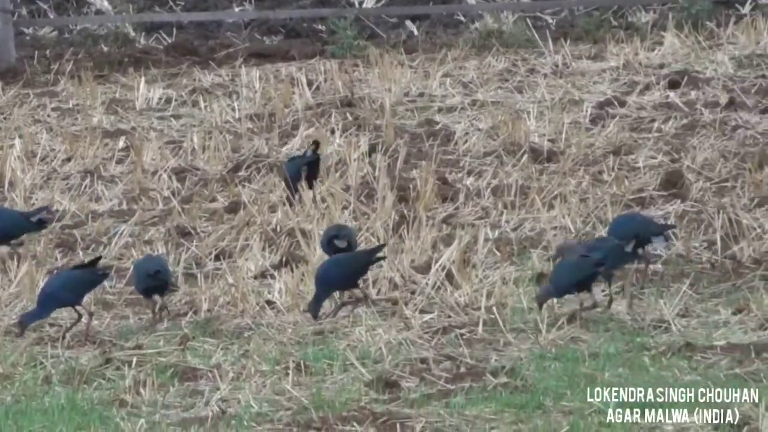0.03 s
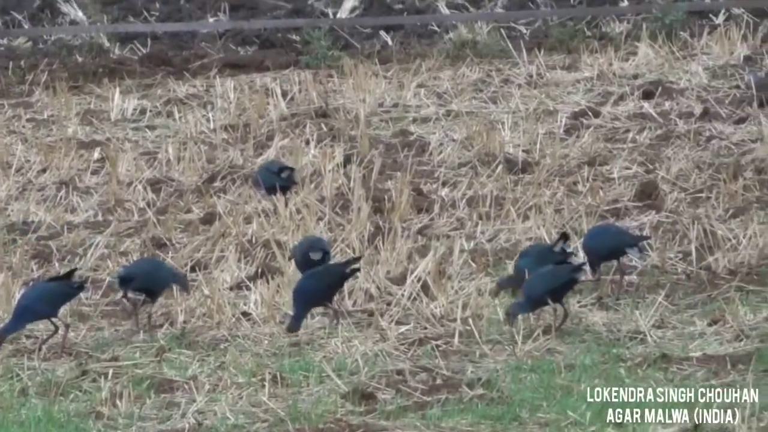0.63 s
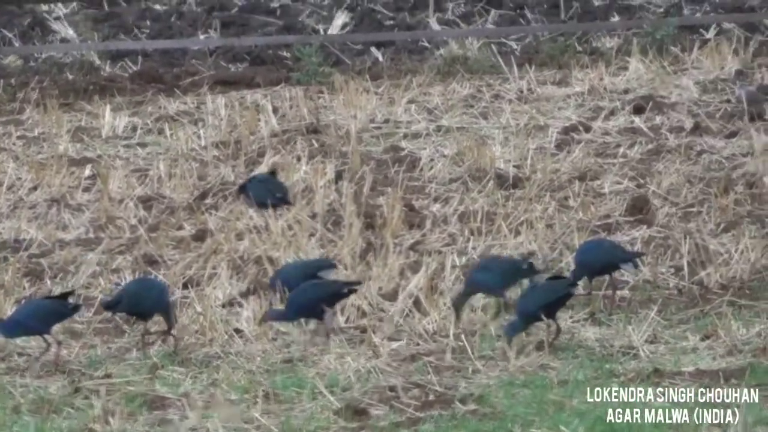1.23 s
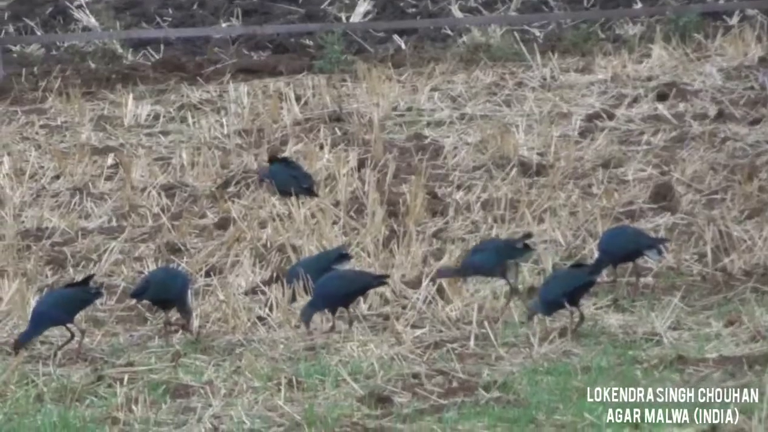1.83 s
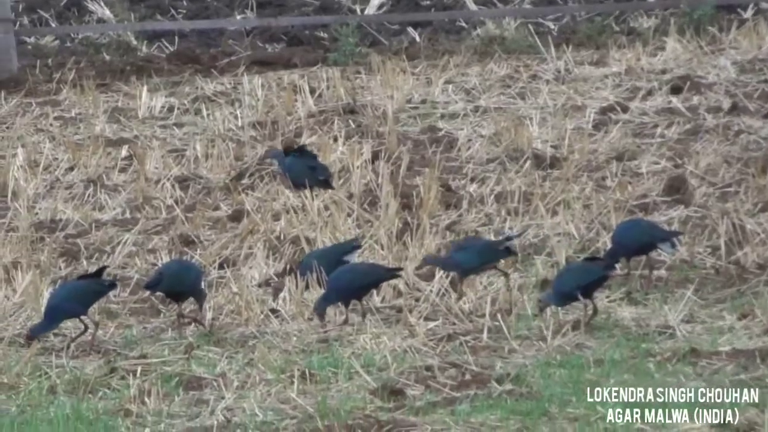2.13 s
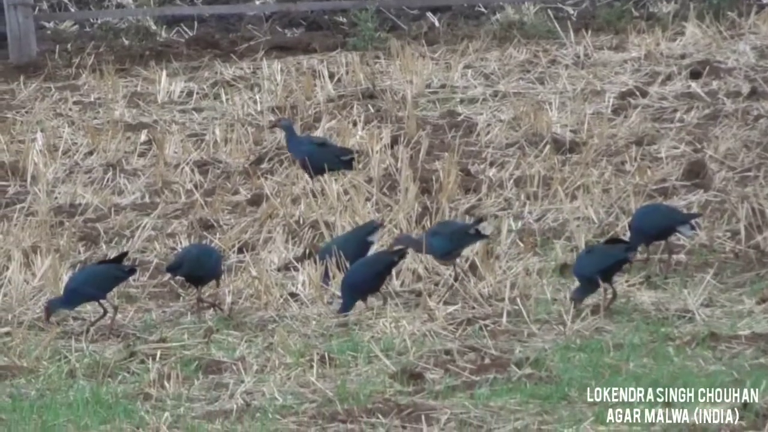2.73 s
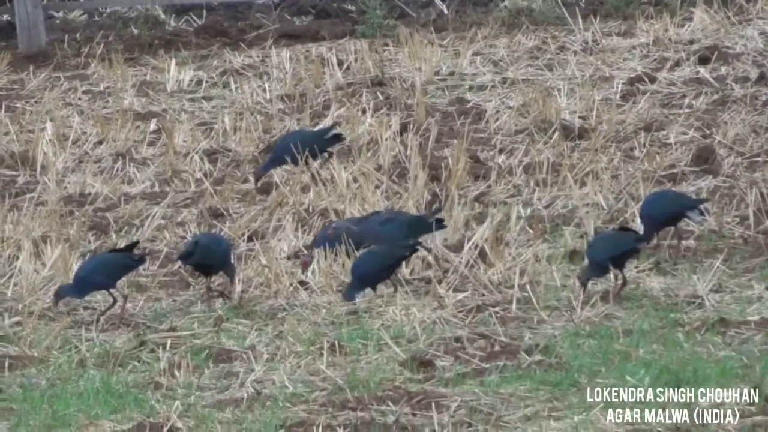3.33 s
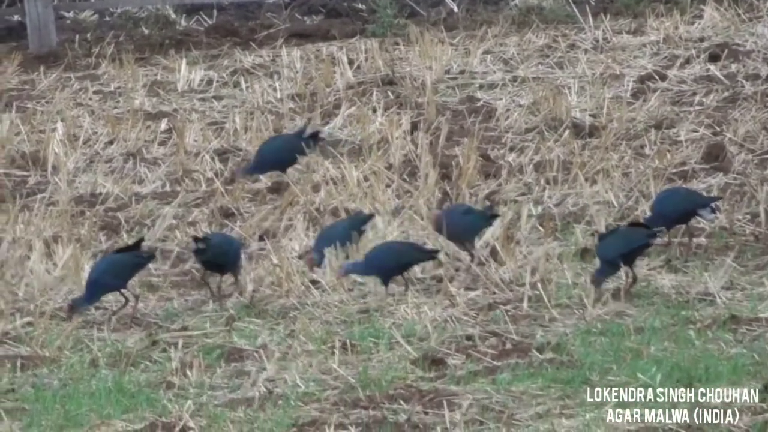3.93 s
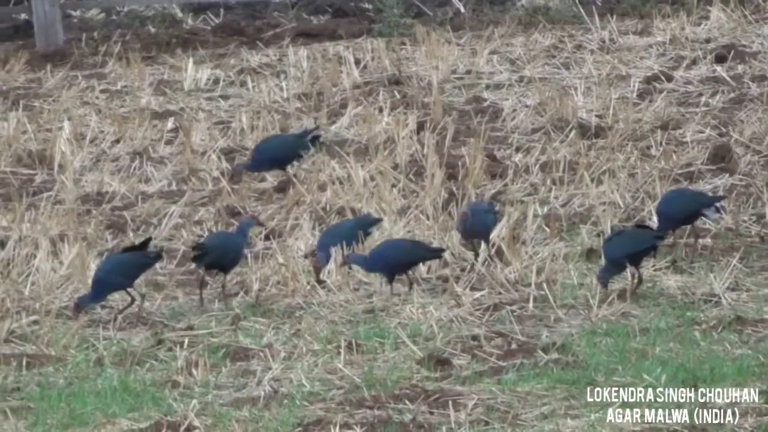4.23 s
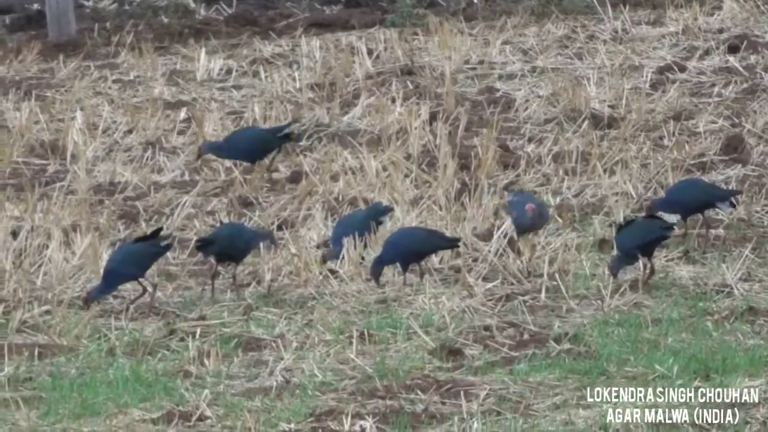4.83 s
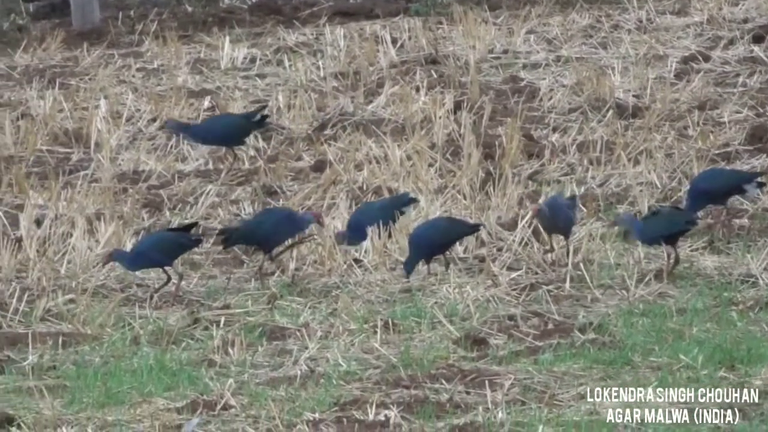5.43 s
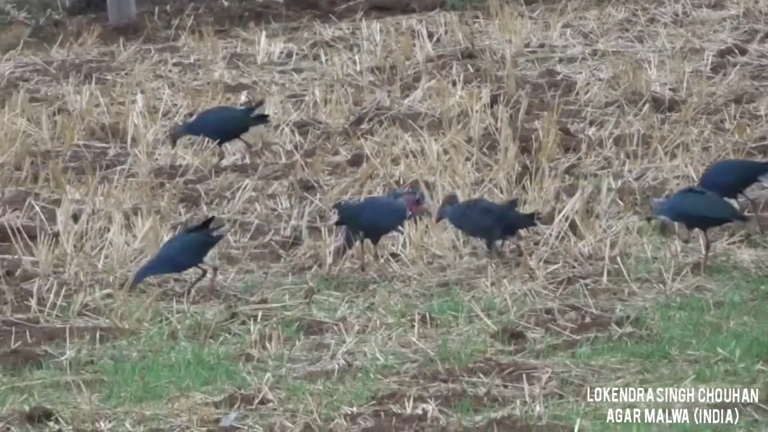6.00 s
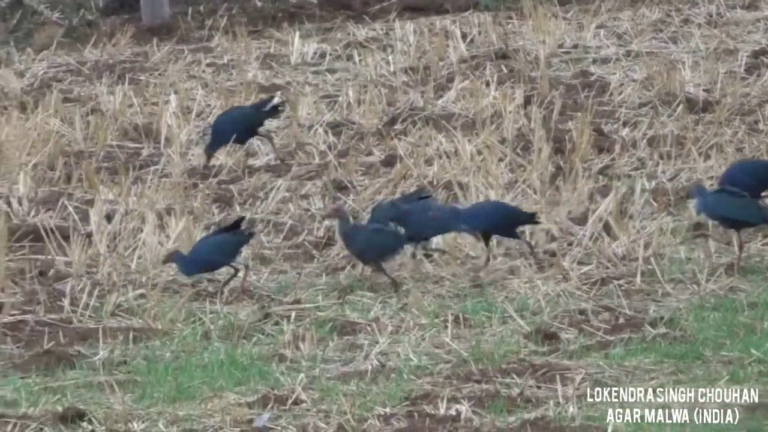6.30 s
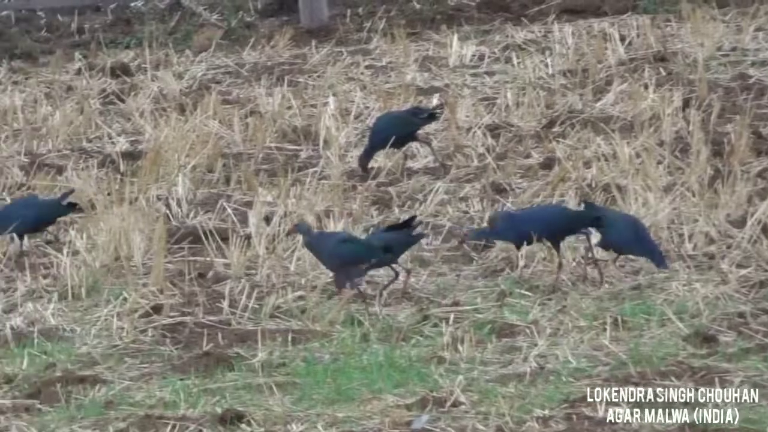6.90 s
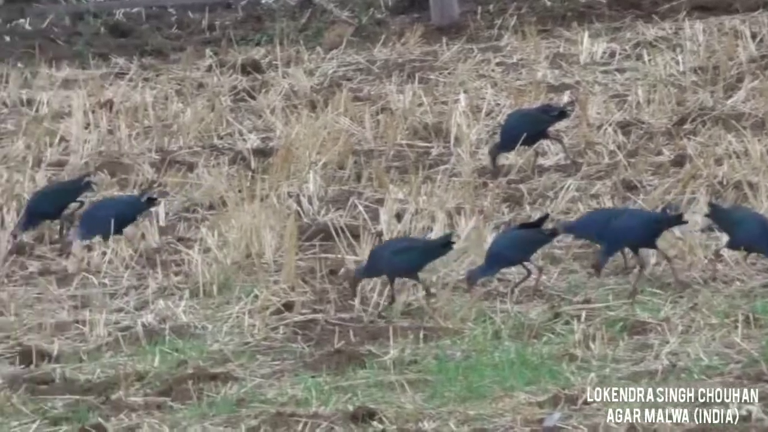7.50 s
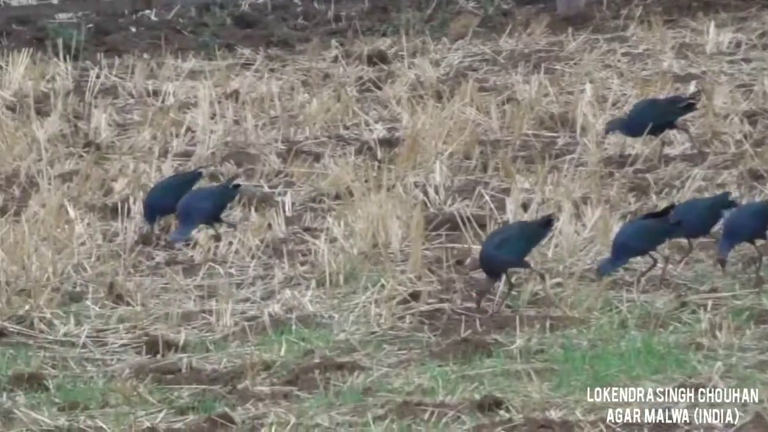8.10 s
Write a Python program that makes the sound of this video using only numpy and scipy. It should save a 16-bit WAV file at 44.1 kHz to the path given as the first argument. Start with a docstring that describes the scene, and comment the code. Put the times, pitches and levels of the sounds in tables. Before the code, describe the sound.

High chirping and hoarse, distant bird calls in an open field, with a steady hiss and some knocks on the microphone.

```python
"""Small birds around a stubble field, heard at the two microphone ports of a hand-held camera.
Over steady outdoor noise, one bird buzzes (a pulsed tone), far ones rasp (narrow-band noise), one twitters
and one ticks in falling chips (gliding tones). A thin chirr and faint far whistles join them.
After a second, fingers first knock and rub the camera body (impact and friction). Near seven seconds a
close bird chirps once, with a rough lower voice, and the fingers bump more and more towards the end."""
import sys
import numpy as np
from scipy import signal
from scipy.fft import rfft, irfft, next_fast_len
from scipy.io import wavfile

SR = 44100
rng = np.random.default_rng(int(sys.argv[2]) if len(sys.argv) > 2 else 0)


def wav_out(sig):
    """Save sig, one row per channel (or a flat mono array), as 16-bit PCM at SR to the path in sys.argv[1]."""
    wavfile.write(sys.argv[1], SR, np.round(np.clip(np.atleast_2d(sig).T, -1, 1) * 32767).astype(np.int16))


N = 359415
TIME = np.arange(N) / SR
SIDES = np.array([[.5], [-.5]])   # left and right each take half of a difference


def from_db(db):
    """Amplitude ratio of a level in decibels."""
    return 10 ** (np.asarray(db) / 20)


def unit_rms(x):
    """Normalisation to unit mean power."""
    return x / np.sqrt(np.mean(np.abs(x) ** 2) + 1e-20)


def over_time(rows):
    """Linear interpolation of each column at every sample."""
    times, *columns = np.transpose(rows)
    return [np.interp(TIME, times, c) for c in columns]


def over_hz(rows, hz):
    """Interpolation of each column on a logarithmic frequency axis."""
    points, *columns = np.transpose(rows)
    return np.array([np.interp(np.log(hz + 1), np.log(points), c) for c in columns])


def add(track, start_s, sound):
    """Superposition: a sound adds to the track from its onset."""
    at = int(round(start_s * SR))
    first, last = max(at, 0), min(at + len(sound), N)
    if last > first:
        track[first:last] += sound[first - at:last - at]


def drift(size, rate_hz):
    """Random modulation: Gaussian values joined by straight lines."""
    steps = np.arange(size) * rate_hz / SR
    return np.interp(steps, np.arange(400), rng.standard_normal(400))


def note(contour, rough, stretch=.98):
    """A sinusoid follows a (t/s, f/Hz, level/dB) contour, with random frequency and amplitude modulation."""
    times, hz, db = np.transpose(contour)
    times = np.sort(times) * stretch
    t = np.arange(times[0], times[-1], 1 / SR)
    pitch = np.interp(t, times, hz) * (1 + rough * .0072 * drift(len(t), 700))
    amplitude = from_db(np.interp(t, times, db) + rough * 1.3 * drift(len(t), 400))
    edges = np.clip(np.minimum(t - times[0], times[-1] - t) / .001, 0, 1)
    return edges * amplitude * np.sin(2 * np.pi * np.cumsum(pitch) / SR)


def outdoors(x, pan_db, lead_rad, scatter_db, t60_s, onset_s=.008):
    """Direct sound differs in phase between the ports; scattering by stubble and bushes adds a tail."""
    size = next_fast_len(N + SR)
    t = np.arange(SR // 2) / SR
    build_up = 1 - np.exp(-(t / onset_s) ** 2)
    tail = rng.standard_normal((2, len(t))) * from_db(-60 * t / t60_s) * build_up
    tail /= np.sqrt(np.sum(tail ** 2, axis=1, keepdims=True))
    paths = np.exp(1j * lead_rad * SIDES) + from_db(scatter_db) * rfft(tail, size)
    return irfft(rfft(x, size) * paths * from_db(pan_db * SIDES), size)[:, :N]


# Relative spectral density of the outdoor noise: f/Hz, left level/dB, right level/dB
FIELD_SPECTRUM = [(40.3, -42, -35), (153, -46, -50), (223, -21.5, -22), (311, -12, -11.5),
                  (630, -1.5, -1.5), (796, -3.5, -2.5), (1120, -5, -2), (1124, 2, -1), (1670, -1, -0.5),
                  (1830, -3, -5.5), (2070, -2, -3), (2310, -7, -5.5), (2880, -6, -6), (3160, -2.5, -6),
                  (3900, -3, -7.5), (4520, 0, -5.5), (5600, -4, -9), (6270, -4, -5.5), (7250, -13, -11.5),
                  (8260, -15.5, -17), (8600, -25, -16.5), (10800, -23.5, -16)]
# Its slow swell, taken about each column's mean: t/s, body level/dB, hiss level/dB
FIELD_SWELL = [(0.0, -55, -72), (1.3, -55.5, -71.5), (2.25, -53.5, -70), (3.15, -54.5, -71.3),
               (4.6, -56, -75), (5.15, -55.5, -76), (6.35, -56, -75), (6.8, -56.5, -73), (8.15, -56.5, -73)]
# Its likeness at the two ports: f/Hz, coherence, phase lead of the left/rad
FIELD_COHERENCE = [(100, 0.98, -0.5), (300, 0.88, -0.8), (600, 0.57, 0.15), (1280, .5, -1.26),
                   (2360, 0.15, -1.2), (2810, 0.094, 1.8), (3300, 0.19, -1.5), (4200, 0.53, -1.34),
                   (5500, 0.078, -2.5), (7000, 0.05, -2.5), (9000, 0.015, -7)]
def field_noise(level_db=-50.5, split_hz=7000):
    """Partial coherence: far-off noise is the sum of a part common to both ports and a part of their own."""
    size = next_fast_len(N)
    hz = np.fft.rfftfreq(size, 1 / SR)
    common, *own = rfft(rng.standard_normal((3, size)))
    coherence, lead = over_hz(FIELD_COHERENCE, hz)
    air = np.sqrt(coherence) * common * np.exp(1j * lead * SIDES) + np.sqrt(1 - coherence) * np.array(own)
    air *= from_db(over_hz(FIELD_SPECTRUM, hz)) * (hz < SR / 3)
    low_share = 1 / (1 + (hz / split_hz) ** 8)
    body, hiss = [irfft(air * share, size)[:, :N] for share in (low_share, 1 - low_share)]
    body_db, hiss_db = [db - np.mean(db) for db in over_time(FIELD_SWELL)]
    return from_db(level_db) * unit_rms(body * from_db(body_db) + hiss * from_db(hiss_db))


# Contour of one buzz: t/s from its peak, f/Hz, relative level/dB
BUZZ_CONTOUR = [(-.080, 7800, -10), (-.050, 7750, 2), (-.028, 7650, 4.5), (-.003, 7600, 6),
                (.003, 7560, -14)]
# Runs of evenly spaced buzzes: first t/s, last t/s, count, relative level/dB
BUZZ_SERIES = [(.105, .768, 3, -56.5), (1.155, 1.757, 3, -57.5), (2.165, 2.165, 1, -57),
               (2.523, 4.450, 7, -57.5), (4.835, 6.563, 6, -61), (7.024, 8.051, 4, -60.5)]
def buzzing_bird(first_rate_hz=270, last_rate_hz=185):
    """Amplitude modulation chops a high note into pulses, which slow down as it swells."""
    out = np.zeros(N)
    for first_s, last_s, count, db in BUZZ_SERIES:
        for s in np.linspace(first_s, last_s, count):
            tone = note(BUZZ_CONTOUR, rough=.96)
            cycles = np.cumsum(np.linspace(first_rate_hz, last_rate_hz, len(tone))) / SR + rng.random()
            add(out, s + BUZZ_CONTOUR[0][0], from_db(db) * tone * np.sin(np.pi * cycles) ** 2)
    return from_db(1.5) * outdoors(out, pan_db=4, lead_rad=-.68, scatter_db=-11.5, t60_s=.18)


def noise_band(pitch, width_hz):
    """Quadrature modulation by low-pass noise spreads a tone into a band about its moving pitch."""
    lowpass = signal.butter(3, width_hz / 2, fs=SR, output="sos")
    flutter = signal.sosfilt(lowpass, rng.standard_normal((2, SR)))[:, -len(pitch):]
    phase = 2 * np.pi * np.cumsum(pitch) / SR
    return unit_rms(flutter[0] * np.cos(phase) + flutter[1] * np.sin(phase))


# Hoarse calls: t/s, duration/s, level/dB, reference f/Hz, bandwidth/Hz, fraction spent swelling,
# relative level of the lower band/dB
RASP_CALLS = [(0.052, .06, -54.5, 5240, 800, 0.55, -30), (0.577, 0.31, -51.5, 3550, 695, 0.24, -21),
              (.865, 0.038, -42.5, 3440, 1330, 0.1, -30), (1.16, .10, -57, 5530, 900, 0.36, -30),
              (2.028, 0.35, -52.5, 3397, 705, 0.42, -11), (3.03, .35, -54, 3430, 570, 0.66, -11),
              (3.40, 0.097, -56.5, 5800, 698, 0.63, -30), (3.949, .33, -55.5, 3580, 522, 0.27, -12),
              (4.977, 0.33, -51.5, 3590, 794, 0.41, -9.5), (6.102, 0.35, -58.5, 3660, 523, 0.69, -11),
              (7.849, 0.37, -57, 3526, 550, 0.67, -18)]
# Pitch arch of a call: fraction of its duration, ratio to the reference frequency
RASP_CONTOUR = [(0, 0.93), (.3, 0.96), (.6, 0.94), (1, .83)]
def rasping_birds(edge_db=-8, lower_ratio=.58):
    """Narrow-band noise sounds hoarse: each call arches and sinks, and a lower throat band follows."""
    out = np.zeros(N)
    for s, length, db, hz, width, rise, lower_db in RASP_CALLS:
        along = np.linspace(0, 1, int(length * SR))
        pitch = hz * np.interp(along, *np.transpose(RASP_CONTOUR))
        swell = from_db(np.interp(along, [0, rise, 1], [edge_db, 1.5, edge_db]))
        swell *= signal.windows.tukey(len(along), .08)
        voice = noise_band(pitch, width) + from_db(lower_db) * noise_band(pitch * lower_ratio, width / 2)
        add(out, s, from_db(db) * swell * unit_rms(voice))
    return outdoors(out, pan_db=7, lead_rad=-.46, scatter_db=-6, t60_s=.33)


# Contours of the four notes of a twitter: t/s from the steep fall, f/Hz, relative level/dB
TWITTER_NOTES = [
    [(-.080, 4580, -15), (-.068, 4800, -9.5), (-.059, 4740, 0), (-.055, 4550, -27)],
    [(-.056, 5260, -16), (-.048, 5250, -1), (-.039, 4900, -0.5), (-.034, 4850, -27)],
    [(-.028, 3900, -15), (-.020, 4350, -4), (-.013, 4750, 0), (-.009, 5100, -30)],
    [(-.009, 6300, -9), (-.004, 5800, -4), (0, 5220, -2.5), (.005, 4520, 0), (.011, 4150, -8),
     (.019, 4060, -7.5), (.027, 4080, -13)],
]
# Twitters: t/s of the steep fall, relative level/dB, gain of the two opening notes/dB
TWITTER_PHRASES = [(0.135, -46.5, -1), (.400, -43, 0), (.650, -46.5, -5), (0.927, -44.5, 4.5),
                   (1.199, -49, -5), (1.430, -47.5, 3), (1.698, -42.5, -7.5), (1.963, -41, -1.5),
                   (2.231, -48, 1), (2.508, -48, -2), (4.901, -43, -7), (5.165, -39, -8),
                   (5.434, -39.5, -3), (5.702, -43, -1.5), (5.969, -40.5, 1), (6.23, -44, 2.5),
                   (6.501, -40.5, -5), (6.767, -43.5, 0), (7.036, -47.5, 4.5)]
def twittering_bird(detune=.0065, vary_db=1):
    """Frequency modulation draws four gliding notes, heard from the left; each repeat varies slightly."""
    out = np.zeros(N)
    for s, db, opening_db in TWITTER_PHRASES:
        for contour, lift_db in zip(TWITTER_NOTES, [opening_db, opening_db, 0, 0]):
            sung = np.array(contour) * [1, 1 + rng.normal(0, detune), 1]
            gain = from_db(db + lift_db + rng.normal(0, vary_db))
            add(out, s + contour[0][0], gain * note(sung, rough=.96))
    return from_db(-2) * outdoors(out, pan_db=13, lead_rad=-1.9, scatter_db=-11, t60_s=.35)


# Contour of one chip: t/s from its middle, f/Hz, relative level/dB
CHIP_CONTOUR = [(-.009, 6665, -30), (-.006, 6590, -3.5), (-.002, 6360, 0.5), (.002, 6170, 3.5),
                (.006, 6050, 0), (.009, 5850, -6.5), (.011, 5750, -30)]
# Phrases, a triplet and then single chips: triplet t/s, first single t/s, last single t/s, count of singles
CHIP_SERIES = [(.085, .445, .752, 3), (.957, 1.268, 1.549, 3), (1.718, 2.148, 2.290, 2),
               (2.443, 2.676, 2.943, 3), (3.100, 3.325, 3.746, 4), (3.899, 4.125, 4.503, 4),
               (4.653, 4.882, 5.286, 4), (5.445, 5.668, 6.080, 4), (6.242, 6.468, 6.876, 4),
               (7.025, 7.251, 7.708, 4), (7.864, 8.101, 8.101, 1)]
def chipping_bird(triplet_db=-41.5, first_db=-48, later_db=-49.5, spacing_s=.037, vary_db=.6):
    """A brief downward sweep is heard as a tick; a faint flick leads into each triplet and each single."""
    out, onset_s = np.zeros(N), CHIP_CONTOUR[0][0]
    flick_db, flick_lead_s, flick_stretch = -8, .020, .642
    for triplet_s, first_s, last_s, count in CHIP_SERIES:
        single_times = np.linspace(first_s, last_s, count)
        singles = [(s, later_db if k else first_db, 1) for k, s in enumerate(single_times)]
        for s, db, repeats in [(triplet_s, triplet_db, 3)] + singles:
            flick = note(CHIP_CONTOUR, rough=.91, stretch=flick_stretch)
            add(out, s - flick_lead_s + onset_s * flick_stretch, from_db(db + flick_db) * flick)
            for k in range(repeats):
                gain = from_db(db + rng.normal(0, vary_db))
                add(out, s + k * spacing_s + onset_s, gain * note(CHIP_CONTOUR, rough=.41))
    return outdoors(out, pan_db=6.5, lead_rad=.94, scatter_db=-12, t60_s=.14, onset_s=.015)


def far_flock(softest_db=-56, range_db=2, count=60):
    """A random point process: tiny glides from distant birds come at independent times and pitches."""
    out = np.zeros(N)
    for when, height, length, slide, loud in rng.random((count, 5)):
        hz, half_s = 3800 + 2800 * height, .008 + .012 * length
        fall_hz = hz * .085 * (slide - .3)
        contour = [(0, hz + fall_hz, -12), (half_s, hz, 0), (2 * half_s, hz - fall_hz, -12)]
        add(out, when * TIME[-1], from_db(softest_db + range_db * loud) * note(contour, rough=1.8))
    return outdoors(out, pan_db=9, lead_rad=-.67, scatter_db=-6, t60_s=.25)


# Spells of thin, far chirring: t/s, relative level/dB
CHIRR_SPELLS = [(.27, -53.5), (.95, -54), (1.48, -57), (2.21, -55), (2.81, -57), (3.46, -58), (4.03, -54.5),
                (4.67, -54.5), (5.5, -62), (6.99, -57), (7.8, -56.5)]
def chirring(pitch_hz=4680, width_hz=280, spell_s=.35):
    """Narrow-band noise flutters in amplitude and is heard as a chirr, perhaps an insect."""
    out, size = np.zeros(N), int(spell_s * SR)
    envelope = signal.windows.tukey(size, .35)
    for s, db in CHIRR_SPELLS:
        add(out, s, from_db(db) * envelope * noise_band(np.full(size, pitch_hz), width_hz))
    return from_db(-7) * outdoors(out, pan_db=10.5, lead_rad=-3.1, scatter_db=-6, t60_s=.17)


def slurs(rows, rough, octave_db, edge_db=-10.5):
    """A fundamental and its second harmonic swell and fade along a parabola through three pitches."""
    out, along = np.zeros(N), np.linspace(-1, 1, 11)
    for s, length, *pitches, db in rows:
        pitch = np.polyval(np.polyfit([-1, 0, 1], pitches, 2), along)
        contour = np.column_stack([length * (along + 1) / 2, pitch, db + edge_db * along ** 4])
        add(out, s, note(contour, rough))
        add(out, s, from_db(octave_db) * note(contour * [1, 2, 1], rough))
    return out


# Faint far whistles, plus the rough lower voice of the close bird's chirp at 6.917 s:
# t/s, duration/s, start f/Hz, middle f/Hz, end f/Hz, relative level/dB
FAINT_NOTES = [(.335, 0.15, 3000, 3280, 2600, -55), (2.885, .06, 4250, 4100, 4100, -58),
               (3.505, .025, 4430, 4370, 4300, -52), (3.670, .033, 4180, 4350, 4600, -52),
               (3.722, .055, 4030, 4120, 3990, -43.5), (3.835, 0.047, 4250, 4480, 4745, -54),
               (4.625, 0.045, 2880, 2770, 2550, -50.5), (5.320, .038, 3130, 2840, 3380, -52),
               (5.725, .075, 3300, 3420, 2650, -55.5), (5.730, 0.059, 6650, 6830, 6360, -56.5),
               (5.810, 0.038, 3600, 3330, 2980, -52), (5.815, 0.033, 5240, 4900, 4500, -52),
               (6.917, 0.0246, 2660, 2400, 2040, -52)]
def whistles_and_lower_voice():
    """Reverberation blurs rough gliding tones: far whistles, and the lower voice of the close chirp."""
    song = slurs(FAINT_NOTES, rough=1.64, octave_db=-27)
    return from_db(2) * outdoors(song, pan_db=6, lead_rad=-1.9, scatter_db=-8.5, t60_s=.44)


def body_swing(hz, cycles=.52):
    """A wave packet: one short swing of the camera body, of random phase, centred in 25 ms."""
    turns = np.arange(-SR // 80, SR // 80) / SR * hz
    swing = np.cos(2 * np.pi * turns + rng.uniform(0, 2 * np.pi))
    return swing / np.cosh(np.clip(turns / cycles * 2, -30, 30))


# Brief shifts of the fingers: middle t/s, duration/s, relative level/dB
FINGER_SHIFTS = [(1.24, 0.17, -60), (1.46, 0.073, -66), (3.821, 0.075, -65), (4.256, .17, -61),
                 (4.54, .16, -74), (4.82, .2, -74), (5.431, 0.06, -57.5), (5.84, .15, -70)]
# Rubbing of the grip as the camera is turned: t/s, relative level/dB
TURNING_GRIP = [(5.95, -91), (6.18, -62), (6.6, -57), (6.71, -67), (6.84, -57), (7.05, -63.5),
                (7.23, -49.5), (7.37, -64.5), (7.45, -57.5), (7.6, -85), (7.70, -52.5), (7.80, -42),
                (7.94, -47), (8.05, -38), (8.15, -40.5)]
def grip_envelope(resting_db=-95, edge_db=-12.5):
    """Friction amplitude is a sum: a hand almost at rest, brief finger shifts, then the turn."""
    strength = from_db(resting_db) + from_db(over_time(TURNING_GRIP)[0])
    for s, length, db in FINGER_SHIFTS:
        half_lengths_away = np.abs(2 * (TIME - s) / length)
        strength += from_db(db + edge_db * np.minimum(half_lengths_away, 10))
    return strength


# Spectrum of the rubbing: f/Hz, relative level/dB
RUB_SPECTRUM = [(30, -34), (70, -9), (120, 0), (220, 0), (350, -1.5), (550, -3.5), (900, -15), (1500, -48)]
def rubbing(grip, grain_db=4):
    """Sliding friction makes low noise that comes in random lumps."""
    size = next_fast_len(N)
    colour = from_db(over_hz(RUB_SPECTRUM, np.fft.rfftfreq(size, 1 / SR))[0])
    noise = irfft(rfft(rng.standard_normal(size)) * colour, size)[:N]
    lumps_db = grain_db * np.interp(TIME, np.linspace(0, TIME[-1], 600), rng.standard_normal(600))
    return unit_rms(noise) * unit_rms(from_db(lumps_db)) * grip


def creaks(grip, per_s=50, hz=300, level_db=4.5, spread_db=3.5):
    """Stick-slip friction: tiny slips of the grip jolt the body at random moments."""
    out = np.zeros(N)
    for at in np.flatnonzero(rng.random(N) < per_s / SR):
        creak = body_swing(hz * np.exp(rng.normal(0, .28)))
        gain = grip[at] * from_db(rng.normal(level_db, spread_db))
        add(out, (at - len(creak) / 2) / SR, gain * creak)
    return out


# Finger knocks on the camera body: t/s, relative level/dB, f/Hz
FINGER_KNOCKS = [(1.183, -39.5, 310), (1.2234, -45, 301), (1.276, -45, 300), (5.8413, -44.5, 344),
                 (6.2967, -38.5, 320), (6.335, -40, 280), (6.3686, -40, 300), (6.4876, -41, 368),
                 (6.59, -40, 226), (6.9475, -40, 276), (6.992, -38.5, 312), (7.0177, -36.5, 304),
                 (7.037, -40, 344), (7.185, -40.5, 342), (7.7432, -26.5, 520), (7.7509, -28.5, 277),
                 (7.8303, -17.5, 410), (7.8685, -15.5, 596), (7.906, -27, 520), (7.9733, -11.5, 470),
                 (8.0027, -21.5, 510), (8.0389, -20, 360), (8.063, -26, 388), (8.0948, -22, 417),
                 (8.1067, -18.5, 420)]
def knocks(tick_db=-11, tick_ratio=1.98, rebound_s=.00553, rebound_db=-8.5):
    """Impact excitation: a finger rocks the body, a brighter tick follows, and the finger rebounds."""
    out = np.zeros(N)
    for s, db, hz in FINGER_KNOCKS:
        start = s - 1 / 80   # centres the swing on the knock
        add(out, start, from_db(db) * body_swing(hz))
        add(out, start + .002, from_db(db + tick_db) * body_swing(hz * tick_ratio, cycles=1))
        add(out, start + rebound_s * rng.uniform(.697, 1.295), from_db(db + rebound_db) * body_swing(hz))
    return out


def handling(low_cut_hz=120, right_delay_s=.00045):
    """Structure-borne sound: the hand's shaking runs through the body and reaches the right port later."""
    grip = grip_envelope()
    highpass = signal.butter(2, low_cut_hz, "high", fs=SR, output="sos")
    jolts = signal.sosfilt(highpass, knocks() + creaks(grip))
    shake = from_db(1) * jolts + from_db(-5) * rubbing(grip)
    delayed = np.interp(TIME - right_delay_s, TIME, shake)
    return np.array([from_db(1) * shake, from_db(3) * delayed])


# A rise, three arches and a long fall: t/s, duration/s, start f/Hz, middle f/Hz, end f/Hz, relative level/dB
CHIRP_NOTES = [(6.845, 0.011, 2750, 3420, 4550, -40), (6.861, 0.021, 3500, 3740, 3230, -32.5),
               (6.885, 0.013, 3400, 3830, 3200, -34), (6.899, .018, 3380, 3690, 2970, -30.5),
               (6.920, 0.0137, 5000, 4800, 4600, -49), (6.933, .019, 4650, 3860, 3050, -37.5)]
def near_chirp():
    """Direct sound dominates near a source: one quick run of glides is heard with little scatter."""
    song = slurs(CHIRP_NOTES, rough=.6, octave_db=-40)
    return from_db(1.5) * outdoors(song, pan_db=3, lead_rad=-1.4, scatter_db=-21, t60_s=.29)


def scene():
    """Superposition of the field, its callers and the hand on the camera."""
    birds = buzzing_bird() + rasping_birds() + twittering_bird() + chipping_bird() + far_flock()
    return field_noise() + birds + chirring() + whistles_and_lower_voice() + handling() + near_chirp()


def record(dry, cutoff_hz=11100):
    """Band limiting: an elliptic low-pass filter cuts the top steeply."""
    return signal.sosfilt(signal.ellip(12, .1, 70, cutoff_hz, fs=SR, output="sos"), dry)


dry = scene()
out = record(dry)
wav_out(out)
```